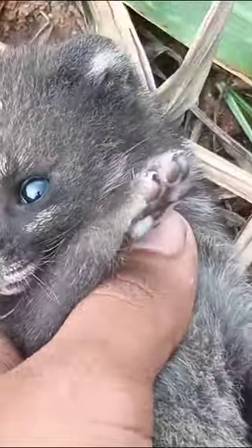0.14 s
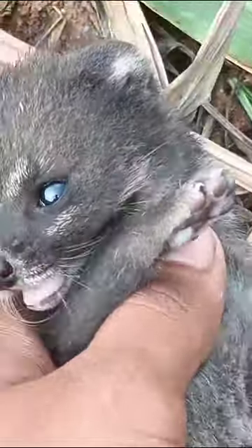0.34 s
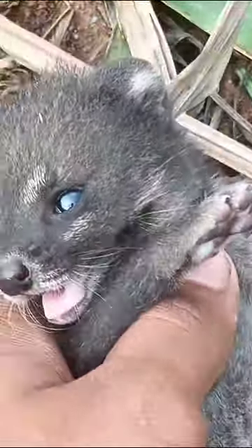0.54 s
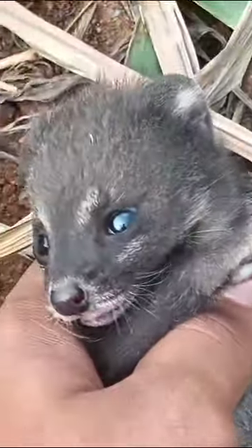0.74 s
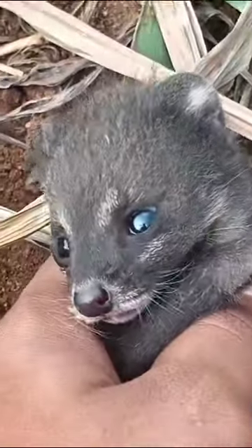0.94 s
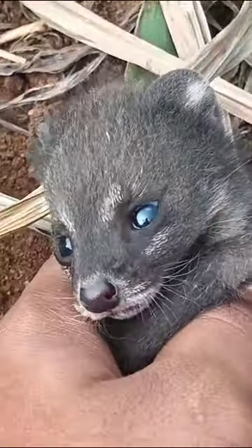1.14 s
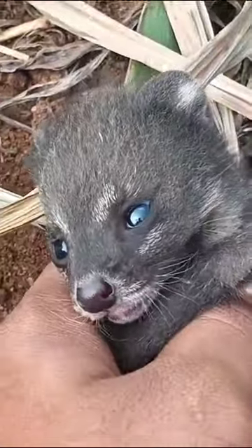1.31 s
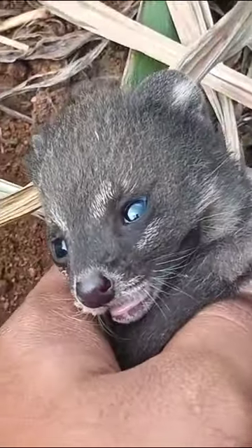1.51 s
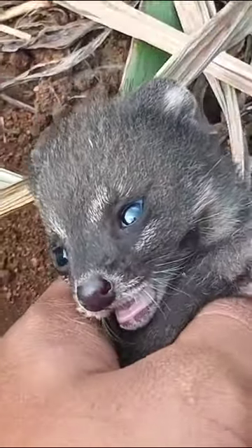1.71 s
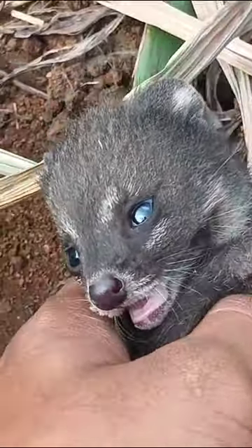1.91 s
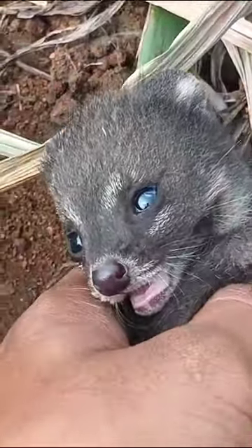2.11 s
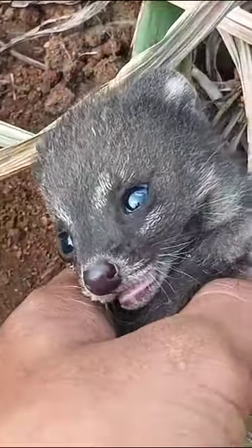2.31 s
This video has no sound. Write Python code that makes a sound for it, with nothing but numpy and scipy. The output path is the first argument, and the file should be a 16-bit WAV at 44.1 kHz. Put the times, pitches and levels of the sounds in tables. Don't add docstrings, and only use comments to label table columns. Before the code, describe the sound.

A small young animal whines close by outdoors. After a tiny nasal squeak at 0.17 s, a bright, slightly raspy cry arches up and down until 0.64 s. A thin, very high littermate whistle runs from 0.1 to 1.15 s, with soft rustles and barely audible low hoots around 0.65-1.05. Another squeak at 1.07 leads into a longer whine, peaking near 1.35, wavering downward and turning up at 2.2, where faint clicks and the whistle return. Quiet rumble and hiss.

```python
import sys
import numpy as np
from scipy import signal
from scipy.fft import rfft, irfft, next_fast_len
from scipy.io import wavfile
from scipy.ndimage import uniform_filter1d

SR = 44100
rng = np.random.default_rng(int(sys.argv[2]) if len(sys.argv) > 2 else 0)


def wrap_up_sound(samples):
    columns = np.atleast_2d(samples).T
    tamed = np.clip(columns, -1, 1)
    steps = np.round(tamed * 32767).astype(np.int16)
    wavfile.write(sys.argv[1], SR, steps)


def ratio(d):
    e = np.asarray(d, float) / 20
    return 10 ** e


N = 103635
T_S = np.arange(N) / SR


def rms_one(x):
    return x / np.sqrt(np.mean(x ** 2) + 1e-20)


def drift(rate_hz):
    settle = 8000
    r = np.exp(-2 * np.pi * rate_hz / SR)
    white = rng.standard_normal(N + settle)
    return rms_one(signal.lfilter([1], [1, -2 * r, r * r], white)[settle:])


def coloured(db_of_hz):
    size = next_fast_len(N)
    hz = np.maximum(np.fft.rfftfreq(size, 1 / SR), 1)
    spectrum = rfft(rng.standard_normal(size)) * ratio(db_of_hz(hz))
    return rms_one(irfft(spectrum, size)[:N])


# f/Hz, level/dB
RUMBLE = [(28, -20), (45, -10.5), (60, -0.75), (130, -6.5), (170, -13), (300, -15), (1000, -26.5),
          (1500, -48.5)]
HISS = [(800, -22), (1200, -12), (2300, -2.5), (3500, -8), (6000, -18.5), (15900, -14.5)]
RUMBLE_DB, RUMBLE_SWAY_DB, RUMBLE_SWAY_HZ = -55, 1, 8
HISS_DB, HISS_SWAY_DB, HISS_SWAY_HZ = -56.5, 2.6, 9.7
HISS_DUCK_DB_PER_DB, DUCK_FROM_DB = -0.03, -32


def rumble_and_hiss(voices):
    def shape(points):
        f_hz, level_db = np.array(points).T
        return lambda hz: np.interp(np.log(hz), np.log(f_hz), level_db)

    loud_db = 10 * np.log10(uniform_filter1d(voices ** 2, size=2000).clip(1e-9))
    duck_db = HISS_DUCK_DB_PER_DB * np.maximum(loud_db - DUCK_FROM_DB, 0)
    rumble_db = RUMBLE_DB + RUMBLE_SWAY_DB * drift(RUMBLE_SWAY_HZ)
    hiss_db = HISS_DB + HISS_SWAY_DB * drift(HISS_SWAY_HZ) - duck_db
    return ratio(rumble_db) * coloured(shape(RUMBLE)) + ratio(hiss_db) * coloured(shape(HISS))


# t/s, length/s, f/Hz, level/dB
HOOTS = [
    (0.818, 0.061, 239, -49.5),
    (.995, 0.069, 211, -48.5),
]
HOOT_SAG_HZ_PER_S = 400


def far_hoots():
    out = np.zeros(N)
    for start_s, length_s, hz, db in HOOTS:
        u = np.clip(T_S - start_s, 0, length_s)
        swell = np.sin(np.pi * u / length_s)
        cycles = hz * u - HOOT_SAG_HZ_PER_S * u * u / 2
        out += ratio(db + 3.5) * swell * np.sin(2 * np.pi * cycles)
    return out


def bursts(rows, spread):
    out, white = np.zeros(N), rng.standard_normal(N)
    for start_s, peak_db, hz, t60_s in rows:
        decay = ratio(-60 * np.maximum(T_S - start_s, 0) / t60_s).clip(1e-9)
        attack = np.clip((T_S - start_s) / t60_s * 10, 0, 1)
        puff = white * (T_S >= start_s) * decay * attack
        band = signal.butter(2, [hz / spread, hz * spread], "band", fs=SR, output="sos")
        puff = signal.sosfilt(band, puff + 1e-18)
        out += ratio(peak_db) * puff / np.abs(puff).max()
    return out


# t/s, peak level/dB, f/Hz, t60/s
TICKS = [
    (.29, -38, 3300, 0.011),
    (.3, -28, 3530, 0.008),
    (.63, -41, 2000, 0.2),
    (.238, -53, 2520, 0.0089),
    (.687, -37.5, 2200, 0.038),
    (.715, -44, 1910, 0.087),
    (.772, -41, 2610, 0.037),
    (2.226, -39, 3600, .012),
    (2.253, -40, 4500, 0.011),
]
# t/s, peak level/dB, f/Hz, t60/s
BUMPS = [
    (.665, -47, 384, 0.19),
    (.7, -50, 520, 0.11),
    (1.24, -42.5, 322, 0.075),
]


def handling():
    return bursts(TICKS, spread=1.31) + bursts(BUMPS, spread=1.25)


def slips(rows):
    return sum(size * np.cos(np.pi / 2 * np.clip((T_S - at_s) / half_s, -1, 1)) ** 2
               for at_s, size, half_s in rows)


def tract_db(peaks, hz):
    valley_db = -63.5
    power = sum(ratio(2 * db) / (1 + (2 * (hz - at) / width) ** 2) ** 2 for at, width, db in peaks)
    return 10 * np.log10(power + ratio(2 * valley_db))


FLUTTER_HZ, FLUTTER_RATE_HZ = 6.69, 43.8
SHIMMER_DB, PARTIAL_SHIMMER_DB, SHIMMER_RATE_HZ = 0.5, 0.35, 36.4
DULLING_DB, EASY_DB = 0.1651, 9
WEAK_FUNDAMENTAL_HZ, WEAK_SLOPE_DB_PER_HZ = 1766, 0.05
BREATH_DB, CLOSING_BREATH_DB = -23.5, 3


def voice(rows, shut, wide, fade_s, sag_hz=0.0, quaver_hz=0.0, airy=None, unsteady=0.99,
          weak_hz=160, closing=0.0):
    rows = np.array(rows, float)
    start_s, end_s = rows[0, 0], rows[-1, 0]
    span = (T_S >= start_s - 0.003) & (T_S < end_s + fade_s)
    t = T_S[span]
    pitch, level_db, *mouth = [np.interp(t, rows[:, 0], column) for column in rows.T[1:]]
    pitch, level_db = uniform_filter1d(pitch, size=350), uniform_filter1d(level_db, size=100)
    if mouth:
        opening, breath_db = np.clip(mouth[0], 0, 1), mouth[1]
    else:
        opening = (closing + 0 * T_S)[span]
        breath_db = BREATH_DB + CLOSING_BREATH_DB * opening

    after = np.clip((t - end_s) / fade_s, 0, 1)
    flutter_hz = unsteady * FLUTTER_HZ * drift(FLUTTER_RATE_HZ)[span]
    pitch = pitch - sag_hz * after + flutter_hz + (quaver_hz + 0 * T_S)[span]

    k = np.arange(1, 11)[:, None]
    partial_hz = k * pitch
    gain_db = (1 - opening) * tract_db(shut, partial_hz) + opening * tract_db(wide, partial_hz)
    gain = ratio(gain_db) * (partial_hz < SR / 2.2)
    waver = np.array([drift(SHIMMER_RATE_HZ)[span] for _ in range(2)])[k[:, 0] % 2]
    lost_effort_db = np.maximum(level_db.max() - EASY_DB - level_db, 0)
    gain = gain * ratio(k * (PARTIAL_SHIMMER_DB * waver - DULLING_DB * lost_effort_db))
    if airy:
        gain[0] *= ratio(-WEAK_SLOPE_DB_PER_HZ * np.clip(WEAK_FUNDAMENTAL_HZ - pitch, 0, weak_hz))
    gain = gain / np.sqrt(np.sum(gain ** 2, axis=0) / 2)

    phase = k * 2 * np.pi * np.cumsum(pitch) / SR - 0.25 * k * k
    tone = np.sum(gain * np.cos(phase), axis=0)
    breath = ratio(breath_db) * coloured(lambda hz: tract_db(airy or shut, hz))[span]
    edge = np.clip((t - start_s + 0.0023) / 0.0051, 0, 1) * (1 - after) ** 2
    out = np.zeros(N)
    out[span] = ratio(level_db + SHIMMER_DB * drift(SHIMMER_RATE_HZ)[span]) * edge * (tone + breath)
    return out


# t/s, f/Hz, level/dB
WHISTLE_LONG = [(0.095, 1940, -49), (0.103, 1800, -44.5), (0.151, 1791, -32), (0.303, 1999, -27.5),
                (0.331, 1970, -25), (0.347, 2000, -23.5), (0.431, 2000, -27.5), (0.491, 1977, -26),
                (0.547, 1967, -32.5),
                (0.558, 1950, -32.5), (0.718, 1912, -31.5), (0.82, 1945, -36.5), (0.874, 1980, -37.5),
               (0.957, 1988, -40), (1.042, 2050, -44.5), (1.08, 2025, -40.5), (1.123, 2036, -40.5),
               (1.132, 2108, -42)]
WHISTLE_AGAIN = [(2.203, 1712, -50), (2.228, 1750, -44), (2.24, 1772, -33.5), (2.268, 1808, -38),
                 (2.28, 1845, -27.5), (2.291, 1837, -35), (2.305, 1878, -29), (2.322, 1903, -33),
                 (2.337, 1897, -29.5)]
# f/Hz, width/Hz, level/dB
THIN = [(2000, 1200, -24), (3930, 2700, -20.5), (5840, 1030, -13), (7460, 1600, -18.5), (9425, 850, 2.26),
        (11420, 960, -14.5), (14000, 3600, -20.5)]
THIN_CLOSED = [(2000, 690, -19), (3930, 1900, -15.5), (5700, 800, -33), (8000, 1300, -12), (9820, 950, 0),
               (12000, 960, -40), (14000, 2400, -38)]
# t/s, size/Hz, half length/s
WAVERS = [
    (.176, 7.5, 0.013),
    (.215, 32, .022),
    (.66, -12, 0.013),
    (.685, 16.5, .02),
    (2.248, -25.5, 0.0093),
    (2.28, 26, 0.015),
    (2.322, 15, 0.022),
]
CLOSING_FROM_S, CLOSING_S = 0.92, 0.17


def littermate():
    quaver_hz = slips(WAVERS)
    closing = np.clip((T_S - CLOSING_FROM_S) / CLOSING_S, 0, 1)
    first = voice(WHISTLE_LONG, THIN, THIN_CLOSED, fade_s=0.032, sag_hz=110,
                  quaver_hz=quaver_hz, closing=closing, unsteady=0.632)
    again = voice(WHISTLE_AGAIN, THIN, THIN_CLOSED, fade_s=0.1,
                  quaver_hz=quaver_hz, closing=0.35, unsteady=0.97)
    return first + again


# t/s, f/Hz, level/dB
SQUEAK_1 = [(0.166, 1570, -53), (0.17, 1286, -47), (0.186, 1154, -42.5), (0.202, 1350, -38.5),
            (0.23, 1510, -42.5)]
SQUEAK_2 = [(1.069, 1348, -46.5), (1.089, 1150, -37.5), (1.1, 1303, -38.5), (1.107, 1513, -39.5),
            (1.124, 1620, -37.5)]
# t/s, f/Hz, level/dB, mouth open/0-1, breath re voice/dB
CALL_1 = [(.232, 1513, -25.5, 0, -40), (.255, 1595, -15.5, 0, -33), (.272, 1708, -21, 0, -33),
          (.283, 1789, -26, 0, -32), (.299, 1859, -19.5, .6, -25), (.306, 1903, -18.5, .8, -40),
          (.326, 1971, -15.5, 1.01, -32), (.35, 2016, -15, 0.97, -27), (.39, 2057, -14.5, 1.01, -31),
          (.43, 2066, -14, 1.17, -29), (.45, 2044, -15, 1.01, -28), (.472, 1967, -16.5, 1.01, -26),
               (.49, 1971, -16.5, 0.92, -24), (.513, 1910, -19, 0.96, -25), (.525, 1855, -16, 1.17, -31),
               (.549, 1801, -16, 1.01, -23), (.573, 1639, -19.5, 0.82, -31), (.616, 1603, -25.5, 0.7, -26)]
CALL_2 = [(1.125, 1593, -22.5, 0.13, -51), (1.129, 1523, -22, 0.075, -48),
          (1.175, 1759, -25.5, 0.049, -57), (1.212, 1948, -22, 0.22, -53),
          (1.272, 2075, -17.5, 0.69, -43.5), (1.336, 2118, -15.5, 0.71, -40),
          (1.42, 2096, -16.5, 0.76, -36.5),
          (1.499, 2059, -18.5, 1.06, -33), (1.592, 1976, -21.5, 0.93, -32.5),
               (1.72, 1888, -18.5, 0.96, -30.5), (1.9, 1786, -25, 0.86, -29),
               (2.04, 1691, -26.5, 1.05, -45), (2.136, 1614, -30.5, 0.77, -40),
               (2.173, 1586, -32.5, 0.76, -26), (2.2, 1682, -31, 0.19, -35),
               (2.228, 1749, -38.5, 0.51, -38)]
# f/Hz, width/Hz, level/dB
NOSE = [(1270, 420, -9), (2630, 770, 3.5), (3300, 460, -10)]
SHUT = [(2100, 454, 2.5), (3153, 505, 1.4), (5170, 1320, -11.5), (7570, 1300, -42.5), (9330, 1960, -25),
        (14000, 3400, -44.5)]
WIDE = [(2080, 560, -2), (3000, 1300, -6.5), (4100, 610, 0), (5350, 1250, 4), (8230, 1520, 0.55),
        (9490, 1430, -5), (12060, 650, -13.5), (14080, 1300, -2.5), (15800, 720, -2)]
HALF = [(2119, 302, 1.5), (3300, 440, -6.5), (3767, 300, -1.05), (4202, 160, 0), (5935, 293, -5),
        (5100, 1400, -11.5), (7120, 530, -17), (9030, 840, -17), (12360, 550, -23.5), (13000, 1760, -24),
        (15530, 2100, -24)]
# f/Hz, width/Hz, level/dB
BREATH_1 = [(3010, 690, -24), (5070, 440, -1), (8700, 1200, -0.5), (13300, 1500, -5)]
BREATH_2 = [(3177, 730, -0.5), (5630, 400, -9), (9500, 2400, -15.5), (13500, 3000, -25.5)]
# t/s, size/Hz, half length/s
SLIPS = [(.361, -44.5, 0.01188), (.406, -39.5, .011), (1.52, -28, 0.012), (1.795, 17.5, .035),
         (1.878, 15.5, 0.013), (1.929, 29.5, .022), (1.984, -19.5, .022), (2.012, 24.5, .018),
         (2.034, -14.5, .012), (2.056, 32, .016), (2.137, 33.5, .018), (2.178, -14, 0.0084)]
# t/s, jitter/Hz, half length/s
RASPS = [
    (.535, 10.8, 0.034),
    (.625, 29, 0.017),
    (1.385, 4.1, 0.025),
    (2.04, 7, .025),
    (2.2, 5.4, 0.014),
]
RASP_RATE_HZ = 300


def held_civet():
    quaver_hz = slips(SLIPS) + slips(RASPS) * drift(RASP_RATE_HZ)
    squeak_1 = voice(SQUEAK_1, NOSE, NOSE, fade_s=0.0048)
    call_1 = voice(CALL_1, SHUT, WIDE, fade_s=0.024, sag_hz=244,
                   quaver_hz=quaver_hz, airy=BREATH_1, unsteady=0.83, weak_hz=124)
    squeak_2 = voice(SQUEAK_2, NOSE, NOSE, fade_s=0.004)
    call_2 = voice(CALL_2, SHUT, HALF, fade_s=0.0071,
                   quaver_hz=quaver_hz, airy=BREATH_2, unsteady=0.7, weak_hz=178)
    return squeak_1 + call_1 + squeak_2 + call_2


ECHO_S, ECHO_DB = 0.004, -30.5


def scene():
    voices = held_civet() + littermate()
    lag = int(ECHO_S * SR)
    echo = np.concatenate([np.zeros(lag), voices[:N - lag]])
    voices = voices + ratio(ECHO_DB) * echo
    mono = rumble_and_hiss(voices) + far_hoots() + handling() + voices
    return np.array([mono, mono])


def low_pass(x):
    return signal.sosfilt(signal.butter(12, 16030, fs=SR, output="sos"), x)


def record(dry):
    lowpass = signal.cheby2(12, 70, 16600, fs=SR, output="sos")
    mix = signal.sosfilt(lowpass, dry)
    return low_pass(mix)


dry = scene()
out = record(dry)
wrap_up_sound(out)
```